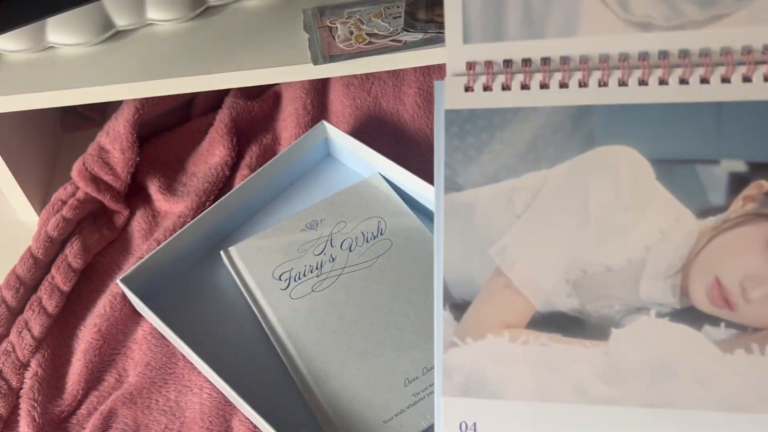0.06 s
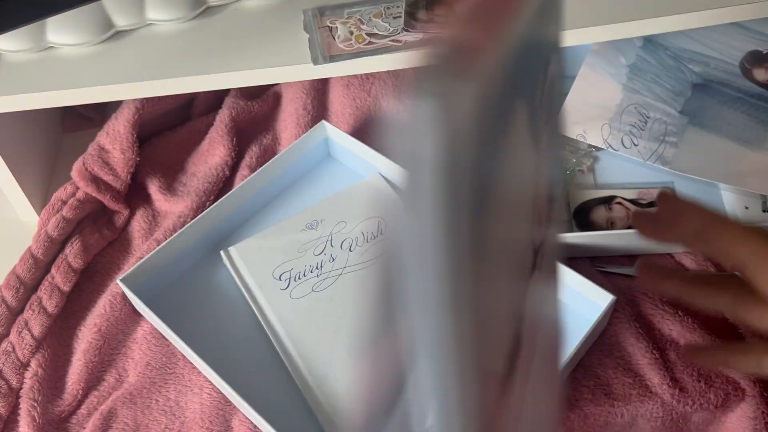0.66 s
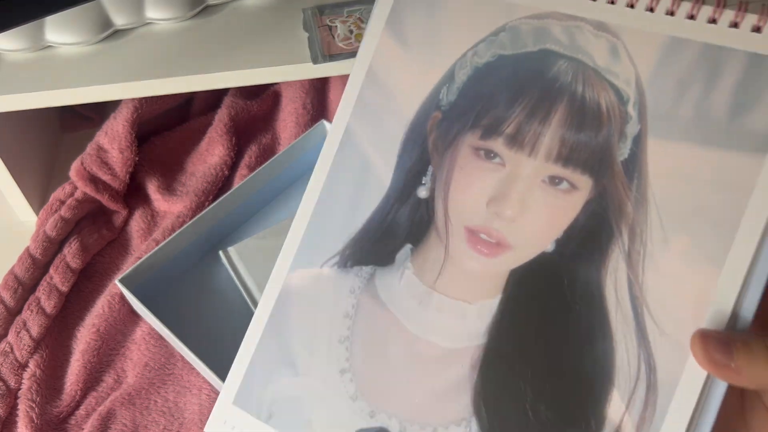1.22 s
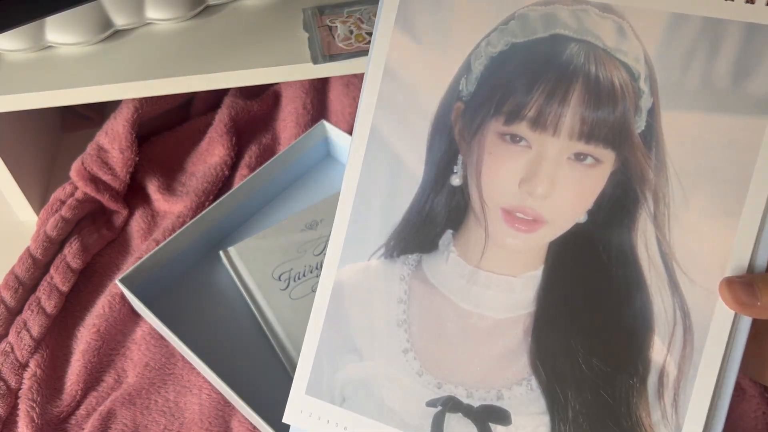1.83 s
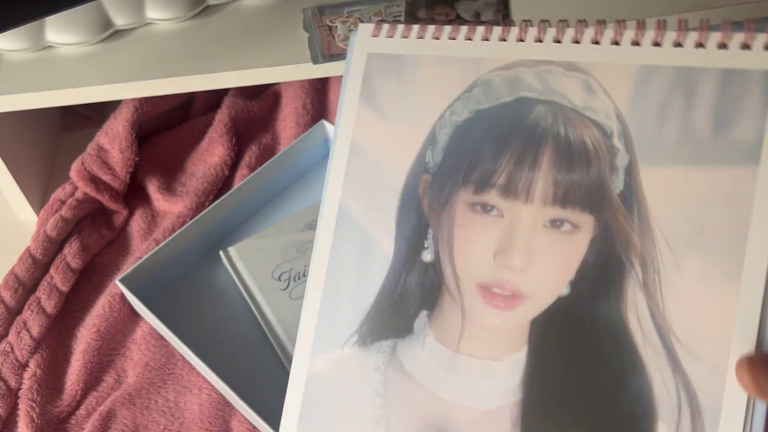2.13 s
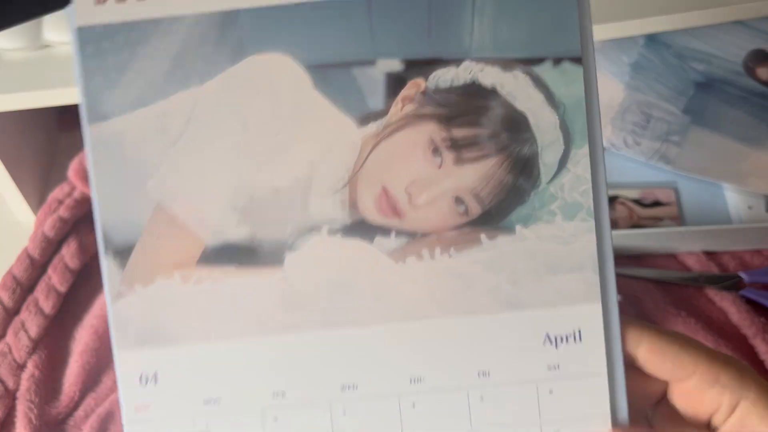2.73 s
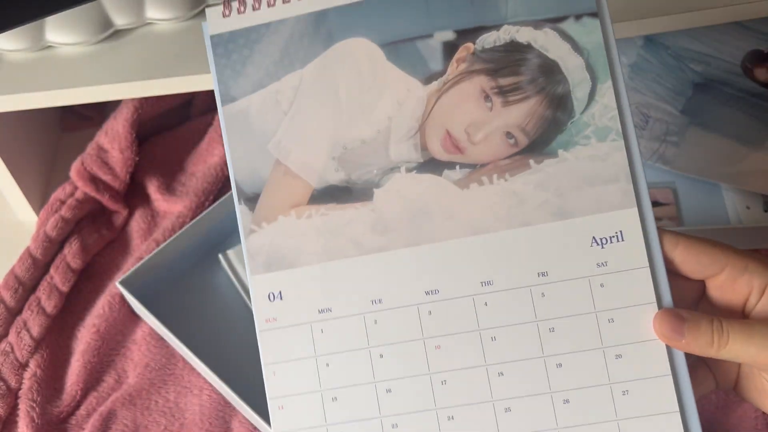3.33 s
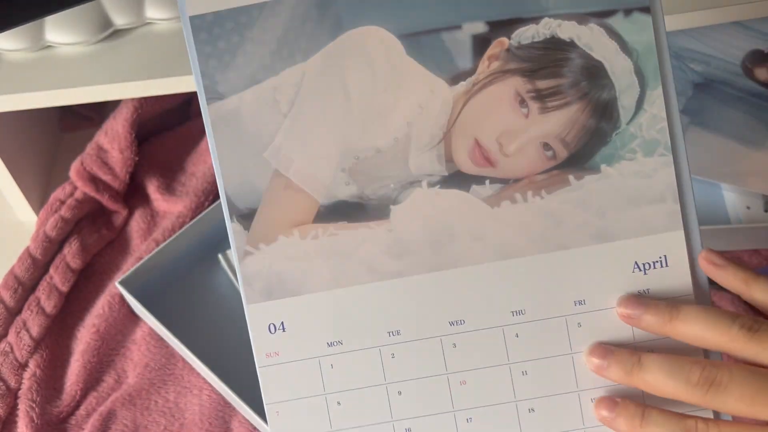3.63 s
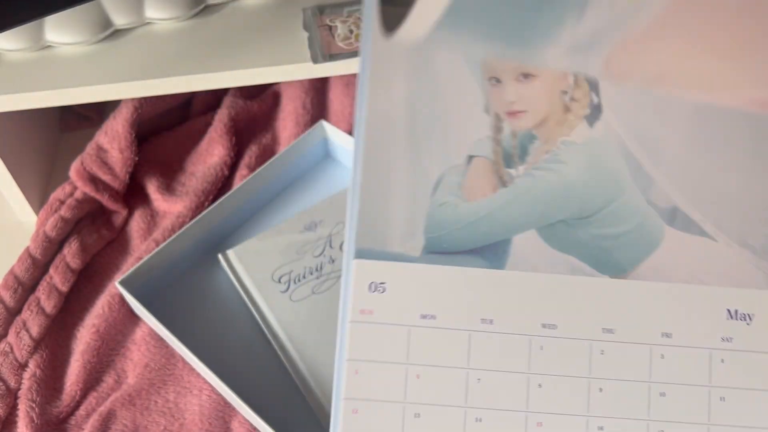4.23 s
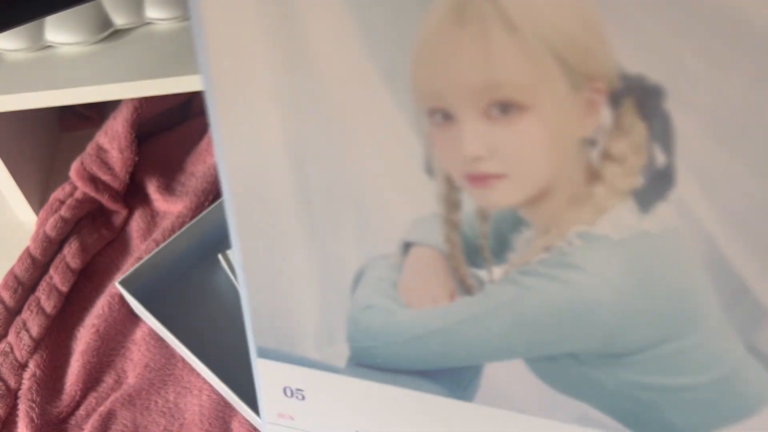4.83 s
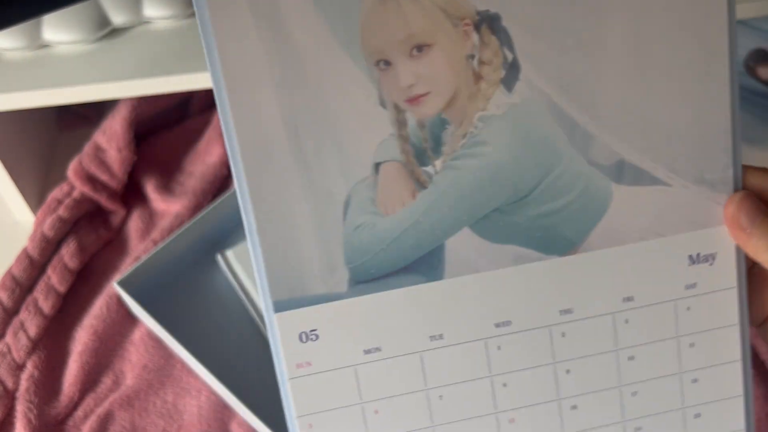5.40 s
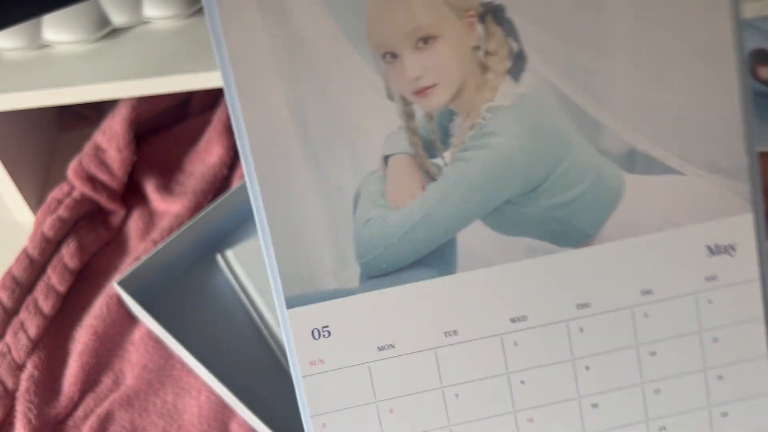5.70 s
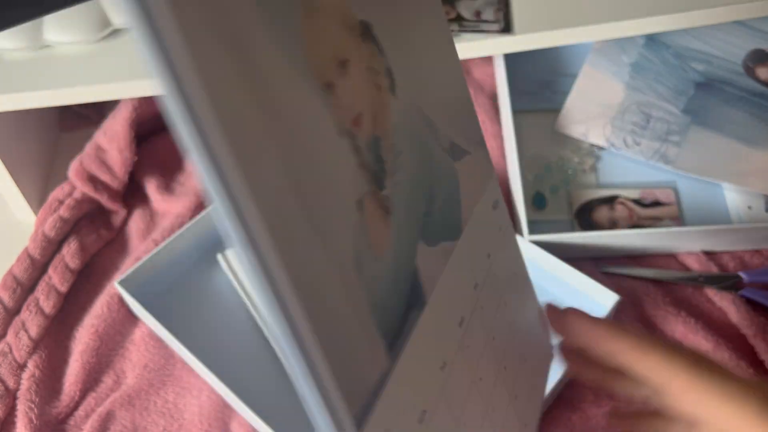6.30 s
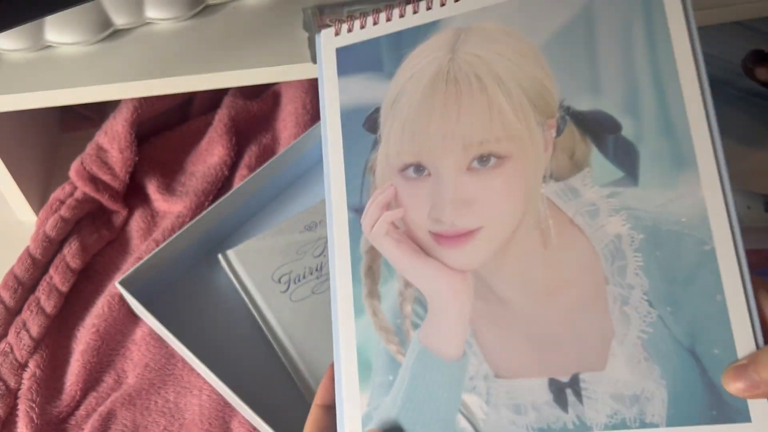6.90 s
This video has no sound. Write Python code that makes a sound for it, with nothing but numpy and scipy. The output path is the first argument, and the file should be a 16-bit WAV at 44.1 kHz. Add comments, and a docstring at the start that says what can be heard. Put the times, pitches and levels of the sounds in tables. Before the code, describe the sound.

A spiral-bound desk calendar is handled close to the microphone in a small, soft room. A stiff page slaps down and the hollow card stand knocks. Faint paper slides follow, then a snap with a soft thump. Past the middle, a page crackles over the wire binding and lands with several sharp flaps. Light taps and small fingertip squeaks finish, over a low, wavering hum.

```python
"""A stiff page slaps down and a hollow card stand knocks: a spiral-bound desk calendar is handled near a phone.
Sheets slide by stick-slip friction, catch on the wire binding and land with a snap; each contact sends
dispersive bending waves through the paper. Fingers pat and rub the gloss, and the hand bumps the stand with low
thumps. Behind it a low hum wavers under a faint drone and hiss, in a small, soft room."""
import sys
import numpy as np
from scipy import signal
from scipy.fft import rfft, irfft
from scipy.io import wavfile
from scipy.ndimage import uniform_filter1d

SR = 44100
rng = np.random.default_rng(int(sys.argv[2]) if len(sys.argv) > 2 else 0)


def dump(signal):
    """Clip the signal to [-1, 1] and save it as 16-bit WAV at the path in sys.argv[1]."""
    limited = np.clip(np.atleast_2d(signal).T, -1, 1)
    pcm = np.round(limited * 32767).astype(np.int16)
    wavfile.write(sys.argv[1], SR, pcm)


N = 306495
TIME = np.arange(N) / SR


# Table levels are relative. A "colour" is the arguments of paper(): level/dB, body/dB, edge/dB, ring f/Hz, ring/dB.
# Sheets landing: t/s, T60/s, colour (five columns), skid level/dB, skid length/s
LANDINGS = [(0.033, 0.038, -21, 10.5, -16, 950, 8, -75, .03),
            (.082, 0.078, -3.5, -2, -10, 1080, 11, -61, .04),
            (0.132, 0.015, -7, -24, -9.5, 5500, -0.5, -75, .02),
            (0.1553, 0.014, -3.5, -2, 1.5, 520, 9, -56, 0.02), (0.205, 0.18, -19, 0, -1, 2400, 2, -70, .03),
            (0.2461, 0.021, -4.5, 15, 1.5, 3300, 3, -53, 0.032),
            (0.774, 0.0087, -20, -4, -1, 5830, 2, -63.5, 0.055),
            (2.3341, 0.026, -2.5, -5.5, -8, 3300, 10, -49, 0.071),
            (2.339, 0.061, -29.5, 7, -14, 690, 24, -74, 0.046),
            (2.73, 0.012, -24, -19, -13.5, 3000, 0.5, -55, 0.08),
            (3.4963, 0.04, -24, 19.5, -29, 1970, 18.5, -67, .025),
            (4.232, 0.05, -13.5, -6, -7.5, 2960, 8, -68, 0.035),
            (4.327, .022, -21, -3, -4, 4800, 5, -72, .03),
            (4.365, 0.039, -11, 20.5, 4, 5200, 5.5, -59, 0.059),
            (4.476, 0.05, -16, 10.5, 8, 3020, 5.5, -52.5, 0.068),
            (4.5448, 0.028, -16.5, 21, -5, 452, 3, -63.5, 0.21),
            (4.6313, 0.034, 4, 5, -3, 2920, 5, -45, 0.045), (4.71, 0.049, 2, 6, -13.5, 780, 3.5, -53, .04),
            (5.379, .01, -33.5, 3, -7, 3050, 9, -76, .02), (5.4104, .025, -20, 8, 2, 4880, 5.5, -49, 0.066),
            (5.642, .027, -32, 22.5, 5, 2290, 7.5, -81.5, 0.35)]

def slaps(skid_swell_s=0.015):
    """Impact, then sliding friction: a sheet lands with a snap and skids on through the same resonances."""
    out = np.zeros((2, N))
    for s, t60, level_db, *timbre, skid_db, skid_s in LANDINGS:
        add(out, *snap(s, t60, [level_db, *timbre]))
        skid_fade_s = max(skid_s - skid_swell_s, .005)
        add(out, *slide(s + skid_swell_s, skid_swell_s, skid_fade_s, [skid_db, *timbre]))
    return out


# The turning page catching on wire loops: t/s, T60/s, level/dB, ring/dB
WIRE_CATCHES = [(3.894, 0.025, -4, -10), (3.919, 0.045, -5, -7), (3.924, 0.019, -2.5, 0),
                (3.959, 0.045, 0.5, 2), (3.9645, 0.089, 0.5, 12.5), (3.975, 0.046, -1.5, 7),
                (3.987, .02, 0, 5), (4.006, 0.015, -2.5, 4), (4.013, 0.0058, -1.5, -4),
                (4.029, 0.026, 0, 3), (4.055, 0.014, -.5, -4), (4.0847, 0.032, 2, -1),
                (4.104, 0.0084, -5, -4.5), (4.11, 0.045, -8.5, 17), (4.13, 0.038, -1.5, 2),
                (4.145, 0.013, -10.5, 12), (4.156, 0.04, -8, 9), (4.17, 0.045, -6, -3),
                (4.1896, 0.026, -3, 3.5)]
# Slackness of that page: t/s, slack (0 taut to 1 limp)
PAGE_SLACK = [(3.89, 0.3), (4.0, 0.49), (4.12, 0.83), (4.19, 0.75)]

def catches(body_db=(-3, 12), edge_db=(-5.5, -17), ring_hz=(600, 500)):
    """Tension sets timbre: ticks on the binding grow fuller, duller and lower. Pairs are (taut, limp)."""
    out = np.zeros((2, N))
    for s, t60, level_db, ring_db in WIRE_CATCHES:
        slack = curve(PAGE_SLACK, s)
        timbre = [taut + slack * (limp - taut) for taut, limp in (body_db, edge_db, ring_hz)]
        add(out, *snap(s, t60, [level_db, *timbre, ring_db]))
    return out


# Paper sliding on paper or wire: peak t/s, swell/s, fade/s, colour (five columns)
SHEET_STROKES = [(.065, 0.077, 0.077, -56.5, 22, 9, 1090, 9),
                 (0.714, 0.061, 0.15, -66.5, -10, -2, 2550, 5.5),
                 (0.971, .14, 0.14, -71.5, 17, 15, 3940, 8), (1.05, 0.03, 0.033, -70.5, 10, 9.5, 3990, 15),
                 (1.245, 0.053, .06, -78, 16, 3, 3920, 14.5),
                 (1.898, 0.028, 0.027, -74.5, 7, 16.5, 4700, 18), (2.24, 0.1, 0.087, -65, 13, 3.5, 2420, 6),
                 (2.868, 0.056, 0.14, -73.5, 15, 17.5, 3200, 5.5),
                 (3.011, .034, 0.15, -65.5, -7, -3, 3250, 3.5),
                 (3.17, 0.05, 0.034, -80.5, 10, 15, 4300, 13),
                 (3.897, 0.052, .055, -50.5, -18, 14.5, 4230, 9),
                 (3.977, 0.094, 0.081, -34, 3, -4.5, 560, 10), (4.115, .06, 0.13, -42, 8, -4, 500, -2),
                 (4.35, 0.08, 0.12, -59, 17, 0.5, 4730, 5), (4.638, .022, 0.016, -38.5, 13, 2, 2860, 0),
                 (4.685, 0.041, 0.085, -42.5, 7, -5, 760, 7.5),
                 (4.88, 0.022, 0.037, -71, 29, 14, 3570, 8.5),
                 (5.105, .012, 0.051, -64.5, -3, 5.5, 3200, -1),
                 (5.496, 0.034, .024, -59.5, -3, 8.5, 3230, 2.5),
                 (6.272, 0.034, 0.062, -62, -5, -7, 3780, 0)]

def strokes():
    """Friction noise: sheets slide over each other and along the wire."""
    out = np.zeros((2, N))
    for peak, swell, fade, *colour in SHEET_STROKES:
        add(out, *slide(peak, swell, fade, colour))
    return out


def snap(s, t60, colour, rough_db=3, crack=.8, lead=80, size=4096):
    """Impulsive excitation: a brush, one crack and exponentially damped flutter. Gives (start, sound)."""
    t = (np.arange(size) - lead) / SR
    approach_db = np.interp(t, [t[0], 0], [-34, -12])
    envelope_db = np.where(t < 0, approach_db, -60 * t / max(t60, .004))
    flutter = rng.standard_normal((2, size)) * gain_of(envelope_db + rough_db * wander(1008, size))
    burst = flutter / np.linalg.norm(flutter, axis=1, keepdims=True)
    burst[:, lead + 16] += crack
    return s + t[0], paper(whitened(spread(burst)), *colour)


def slide(peak, swell, fade, colour, clump_db=2, size=16384):
    """Friction noise follows contact pressure, which swells and fades in clumps. Gives (start, sound)."""
    t = np.arange(size) / SR
    end = swell + fade
    pressure_db = np.interp(t, [0, swell, end], [-10, 6, -14]) + clump_db * wander(199.4, size)
    contact = np.interp(t, [0, swell / 3, end, end + .012], [0, 1, 1, 0])
    return peak - swell, paper(friction(size) * gain_of(pressure_db) * contact, *colour)


def friction(size, grains_per_s=2200, grain_db=4.0, hiss_gain=0.59):
    """Stick-slip motion: tiny random slips over a smooth hiss."""
    strengths = gain_of(grain_db * np.minimum(rng.exponential(1, size), 3))
    slips = rng.random(size) < grains_per_s / SR
    grains = unit_rms(strengths * slips * rng.choice([-1, 1], (2, size)))
    hiss = hiss_gain * rng.standard_normal((2, size))
    return unit_rms(shifting_contact(spread(grains + hiss)))


def shifting_contact(x, depth_db=3.5, bins=5, frames=9):
    """Spectral modulation: as a sheet bends its contact moves, so patches of spectrum flare and fade."""
    spectra = signal.stft(x, nperseg=256)[2]
    patches = uniform_filter1d(rng.standard_normal(spectra.shape[1:]), bins, axis=0)
    patches = unit_rms(uniform_filter1d(patches, frames, axis=1))
    return signal.istft(spectra * gain_of(depth_db * patches), nperseg=256)[1][:, :x.shape[1]]


# Broad spectrum of the sheets: f/Hz, level/dB
PAPER_SPECTRUM = [(40, -54), (80, -16.5), (150, -5), (300, -2), (500, -1.5), (1500, 1), (4000, -1),
                  (9000, -9.5), (16000, -9.5)]
# Resonances of a sheet: f/Hz, bandwidth/Hz, level/dB
SHEET_MODES = [(606, 135.6, 0), (926, 100, -3), (1580, 600, -2.5), (2310, 54, 2.5), (2870, 130, -3),
               (3540, 90, 2), (4300, 440, -1.5)]

def paper(drive, level_db, body_db, edge_db, ring_hz, ring_db, delay_at_1khz_s=0.001199, size=2048):
    """Thin-plate response: slack gives body, a sharp edge brightness, the bend one broad resonance."""
    signed_hz = np.fft.fftfreq(size, 1 / SR)
    hz = np.abs(signed_hz) + 1
    db = level_db + spectrum_at(PAPER_SPECTRUM, hz)
    db += body_db / (1 + (hz / 700) ** 2)
    db += edge_db / (1 + (5500 / hz) ** 4)
    db += ring_db * np.exp(-(2 * np.log2(hz / ring_hz)) ** 2)
    db += sum(peak / (1 + (2 * (hz - f) / width) ** 2) for f, width, peak in SHEET_MODES)
    minimum_phase = np.exp(np.conj(signal.hilbert(db * np.log(10) / 20)))
    # bending waves are slower at low frequency, so every click sweeps down
    dispersion = np.exp(-4j * np.pi * delay_at_1khz_s * np.sign(signed_hz) * np.sqrt(1000 * hz))
    response = faded(np.fft.ifft(minimum_phase * dispersion).real)
    return signal.fftconvolve(drive, response[None], axes=1)


# Blows on the stand: t/s, level/dB
STAND_BLOWS = [(0.078, -27), (0.0807, -28.5), (.087, -22.5), (0.0928, -32.5), (0.101, -45)]
# Modes of the stand: f/Hz, level/dB, T60/s
STAND_MODES = [(125, -12, .1), (250, -13, .06), (345, -8, .06), (425, -7, .05), (695, -9, .04),
               (795, -2, .045), (1098, -1, .048), (1225, -3, .045), (1356, -5, .04), (1525, -4, .033),
               (2045, -18, .03)]

def knocks(gain_db=0.5, attack_s=0.00045, size=8192):
    """Modal ringing: the hollow card stand rattles on the pages, and flexing detunes each blow a little."""
    out, t = np.zeros((2, N)), np.arange(size) / SR
    for s, level_db in STAND_BLOWS:
        flex = rng.uniform(.965, 1.035, len(STAND_MODES))
        ring = sum(gain_of(db - 60 * t / t60) * np.sin(2 * np.pi * (hz * detune * t + rng.random()))
                   for (hz, db, t60), detune in zip(STAND_MODES, flex))
        add(out, s, gain_of(level_db + gain_db) * ring * (1 - np.exp(-t / attack_s)))
    return out


# Low thumps of the hand bumping the stand: t/s, level/dB, f/Hz, T60/s
STAND_BUMPS = [(.248, -46, 150.5, 0.13), (2.335, -36, 203, 0.051), (2.387, -38, 181, 0.037),
               (4.088, -36, 194, 0.066), (4.109, -38.5, 168, 0.04), (4.119, -33.5, 168, 0.14),
               (4.369, -47, 249, 0.071)]

def thumps(overtone_ratio=1.7, overtone_db=-5, attack_s=0.00117, size=8192):
    """Damped oscillation: each bump gives a brief low thump in two inharmonic modes."""
    out, t = np.zeros((2, N)), np.arange(size) / SR
    for s, level_db, hz, t60 in STAND_BUMPS:
        phase = 2 * np.pi * hz * t
        flap = np.sin(phase) + gain_of(overtone_db) * np.sin(overtone_ratio * phase)
        add(out, s, flap * gain_of(level_db - 60 * t / t60) * (1 - np.exp(-t / attack_s)))
    return out


# A fingertip on gloss: peak t/s, swell/s, fade/s, level/dB, peak fundamental f/Hz,
# pitch sag at both ends (0 to 1), scuff level/dB, scuff edge/dB
FINGER_DRAGS = [(.414, 0.015, 0.036, -60.5, 1897, 0.3, -58, 3),
                (2.793, 0.025, 0.019, -56.5, 956, 0.32, -50.5, -10),
                (5.159, 0.014, 0.059, -64.5, 2570, 0.03, -62, -4.5),
                (5.916, 0.025, 0.011, -61, 2530, 0.25, -61.5, -4.5),
                (6.415, .035, 0.027, -59.5, 710, 0.47, -59, 0),
                (6.617, 0.043, 0.057, -49.5, 730, 0.39, -51.5, 2)]
SCUFF_LINGER_S, SCUFF_BODY_DB, SCUFF_RING_HZ, SCUFF_RING_DB = 0.033, 5.5, 1750, 5.5

def drags(harmonics_db=(0, -1, -8, -16, -13)):
    """Friction-induced vibration: a fingertip squeaks, its pitch following its speed, over a dry scuff."""
    out = np.zeros((2, N))
    for s, swell, fade, level_db, hz, sag, scuff_db, edge_db in FINGER_DRAGS:
        t = np.arange(-swell, fade, 1 / SR)
        speed = np.cos(np.pi / 2 * t / np.where(t < 0, swell, fade))
        pitch = hz * (1 - sag * (1 - speed))
        chatter = rng.standard_normal(len(t))
        squeak = sum(gain_of(db) * unit_rms(resonate(chatter, k * pitch, 4.5 * np.sqrt(k * hz)))
                     for k, db in enumerate(harmonics_db, 1))
        squeak = signal.lfilter(*signal.butter(1, 3000, fs=SR), squeak)  # soft skin dulls the top
        add(out, s - swell, unit_rms(squeak) * gain_of(level_db) * speed ** 2)
        scuff_colour = [scuff_db, SCUFF_BODY_DB, edge_db, SCUFF_RING_HZ, SCUFF_RING_DB]
        add(out, *slide(s, swell, fade + SCUFF_LINGER_S, scuff_colour))
    return out


# Finger pads landing on the card: peak t/s, level/dB
FINGER_PATS = [(.272, -58), (0.803, -65.5), (2.385, -66), (3.104, -67.5), (4.795, -71.5), (5.336, -68.5),
               (6.154, -70.5)]
# Timbre of a pat: body/dB, edge/dB, ring f/Hz, ring/dB
PAT_TIMBRE = (26, -8.5, 502, 6.5)

def pats(swell_s=.012, fade_s=0.029):
    """Soft contact excites mostly low frequencies: a finger pad gives a dull brush without a click."""
    out = np.zeros((2, N))
    for s, level_db in FINGER_PATS:
        add(out, *slide(s, swell_s, fade_s, [level_db, *PAT_TIMBRE]))
    return out


# Changes of grip: start t/s, end t/s
GRIP_SHIFTS = [(3.05, 3.64), (5.049, 5.74), (5.599, 6.25)]
# Colour of their rustle: level/dB, body/dB, edge/dB, ring f/Hz, ring/dB
RUSTLE_COLOUR = (-73.5, 10, 3.5, 3200, 8.5)

def grips(uneven_db=4, touches_hz=22):
    """Friction under uneven pressure: the sheets rustle faintly while the fingers shift."""
    contact = sum(np.sqrt(np.interp(TIME, [start, (start + end) / 2, end], [0, 1, 0]))
                  for start, end in GRIP_SHIFTS)
    rustle = friction(N) * contact * gain_of(uneven_db * wander(touches_hz, N))
    return paper(rustle, *RUSTLE_COLOUR)[:, :N]


# Left microphone port relative to the right: f/Hz, level/dB
LEFT_RESPONSE = [(80, -1), (300, -9.5), (700, -2.5), (2000, -7), (4400, -5.5), (9000, -11), (15000, -13)]
# The calendar swinging toward the middle and back: t/s, extra level on the left/dB
LEFT_SWING = [(.1, -2), (.3, -1.5), (.8, 1.5), (2.35, 1), (3.5, 1.5), (4, -2.5), (4.65, -1), (5.4, 0.5),
              (6.6, 0.5)]

def direct_path(calendar, lag_samples=7):
    """Path difference: the calendar is nearer the right port, so the left hears it later and softer."""
    left = np.roll(filtered(calendar[0], LEFT_RESPONSE), lag_samples)
    return np.array([left * gain_of(curve(LEFT_SWING)), calendar[1]])


# Reverberation time of the room: f/Hz, T60/s
ROOM_DECAY = [(150, 0.48), (600, 0.129), (3000, 0.17), (8000, 0.13), (16000, 0.24)]

def room(x, gap_s=.004, density=.1, size=16384):
    """Reverberation: dense reflections from nearby furniture, each band decaying at its own rate."""
    reflections = rng.standard_normal((2, size)) * (rng.random((2, size)) < density)
    reflections *= np.arange(size) > gap_s * SR
    hz, t, spectra = signal.stft(spread(reflections, split_hz=520), SR, nperseg=256)
    decay = gain_of(-60 * t / spectrum_at(ROOM_DECAY, hz)[:, None])
    tail = signal.istft(spectra * decay, SR, nperseg=256)[1]
    return signal.fftconvolve(x, tail / np.linalg.norm(tail[0]), axes=1)[:, :N]


# Level of the hum: t/s, level/dB
HUM_LEVEL = [(0.0, -46), (0.08, -43), (0.31, -43.5), (0.48, -60), (1.45, -57), (1.62, -81), (1.92, -66.5),
             (2.03, -48.5), (2.15, -59.5), (2.61, -50), (2.75, -59.5), (3.06, -52.5), (3.83, -64.5),
             (3.93, -54), (4.2, -60), (6.02, -58.5), (6.06, -64), (6.95, -57)]
# Drift of its pitch: t/s, f/Hz
HUM_DRIFT = [(.05, 83.84), (.55, 100), (1.0, 88.12), (2.6, 84.94), (3.9, 85.44), (4.6, 89.6), (6.25, 92.5),
             (6.5, 77.1), (6.95, 88)]

def hum(gain_db=-0.08, noise_gain=0.64, waver_db=2.5, waver_hz=14):
    """Random amplitude modulation: a low, drifting tone wavers and beats with narrow-band noise."""
    pitch = curve(HUM_DRIFT)
    noise = unit_rms(resonate(rng.standard_normal(N), pitch, 22))
    level_db = gain_db + curve(HUM_LEVEL) + waver_db * wander(waver_hz, N)
    return unit_rms(tone(pitch) + noise_gain * noise) * gain_of(level_db)


# Resonances above the hum: f/Hz, half-bandwidth of each filter stage/Hz, level/dB
DRONE_BANDS = [(120.2, 16, -1), (145.7, 20, -1.5), (178.3, 20, -4), (225.9, 12, -1.5)]
# Level of the drone: t/s, level/dB
DRONE_LEVEL = [(.2, -59), (.9, -63.5), (1.65, -68), (2.2, -65), (3.8, -63.5), (4.8, -64.5), (5.8, -59),
               (6.1, -62.5), (6.9, -60)]

def drone(swell_s=6.645, swell_hz=226, swell_db=-49, rise_s=0.035, fall_s=0.078):
    """Noise-driven resonance: four low bands drone, and a tone swells once at the highest."""
    bands = sum(gain_of(db) * unit_rms(resonate(rng.standard_normal(N), hz, 2 * half_width))
                for hz, half_width, db in DRONE_BANDS)
    swell = gain_of(swell_db) * tone(swell_hz + 4 * wander(27, N))
    swell *= np.exp(-abs(TIME - swell_s) / np.where(TIME < swell_s, rise_s, fall_s))
    return unit_rms(bands) * gain_of(curve(DRONE_LEVEL)) + swell


# Spectral density of the room's hiss: f/Hz, level/dB
AIR_SPECTRUM = [(160, -19), (280, -0.5), (315, -6.5), (393, -6), (498, -10.5), (570, -11.5), (1070, -17),
                (1310, -19.5), (1500, -21.5), (1770, -23), (2320, -21.5), (3730, -11), (5060, -30),
                (12200, -33.5), (16000, -40.5)]

def air(level_db=-74.5, shared_gain=0.56):
    """Partly coherent noise: a faint steady hiss, some of it common to both ports."""
    noise = rng.standard_normal((2, N)) + shared_gain * rng.standard_normal(N)
    hiss = filtered(noise, AIR_SPECTRUM)
    return gain_of(level_db) * hiss / np.std(hiss.mean(0))


def spread(pair, split_hz=2200):
    """Coherence of a wide source: both ports share its lows, but each gets its own highs."""
    lows = signal.lfilter(*signal.butter(2, split_hz, fs=SR), pair[1])
    highs = signal.lfilter(*signal.butter(2, split_hz, "high", fs=SR), pair, axis=1)
    return lows - highs


def resonate(x, hz, stage_width_hz):
    """Two cascaded resonators of unit gain, whose centre can follow a curve."""
    carrier = np.exp(2j * np.pi * np.cumsum(hz * np.ones(len(x))) / SR)
    r = np.exp(-np.pi * stage_width_hz / SR)
    baseband = signal.lfilter([(1 - r) ** 2], [1, -2 * r, r * r], x / carrier + 1e-18)
    return 2 * (carrier * baseband).real


def whitened(x, bins=128):
    """Spectral whitening: a burst loses its broad colour and keeps its fine ripple."""
    spectrum = rfft(x, axis=1)
    power = uniform_filter1d(abs(spectrum) ** 2, bins, axis=1)
    return faded(irfft(spectrum / np.sqrt(power + 1e-12), axis=1))


def filtered(x, table):
    """Linear filtering by a table of f/Hz, level/dB."""
    return irfft(rfft(x) * gain_of(spectrum_at(table, np.fft.rfftfreq(N, 1 / SR))), N)


def spectrum_at(table, hz):
    """Interpolation on a log-frequency axis."""
    f, value = np.transpose(table)
    return np.interp(np.log(hz + 1), np.log(f + 1), value)


def curve(table, t=TIME):
    """Linear interpolation in time."""
    return np.interp(t, *np.transpose(table))


def tone(hz):
    """A sine of unit rms whose phase is the integral of its frequency."""
    return np.sqrt(2) * np.sin(2 * np.pi * np.cumsum(hz) / SR)


def wander(rate_hz, size):
    """A smooth random signal of about unit spread."""
    knots = rng.standard_normal(size)
    return np.interp(np.arange(size) * rate_hz / SR, np.arange(size), knots)


def faded(x):
    """Tapers the second half of a sound to silence."""
    return x * np.clip(np.linspace(2, 0, x.shape[-1]), 0, 1) ** 2


def unit_rms(x):
    return x / np.sqrt(np.mean(x ** 2) + 1e-20)


def gain_of(db):
    return 10 ** (np.asarray(db) / 20)


def add(mix, s, sound):
    """Superposes a mono or stereo sound on both channels at time s."""
    part = mix[:, max(0, round(s * SR)):][:, :sound.shape[-1]]
    part += sound[..., :part.shape[1]]


def scene(room_db=(-16, -12), hum_and_drone_db=(-2.4, 1)):
    """Superposition of direct sound, reverberation and background. Pairs are (left, right)."""
    calendar = slaps() + catches() + strokes() + grips() + pats() + knocks() + drags() + thumps()
    reverberation = gain_of(room_db)[:, None] * room(calendar)
    background = gain_of(hum_and_drone_db)[:, None] * (hum() + drone()) + air()
    return direct_path(calendar) + reverberation + background


def record(dry, low_cut_hz=58, high_cut_hz=15950):
    """Band limiting: the phone cuts the deep bass and the highest treble."""
    thinned = signal.sosfilt(signal.butter(4, low_cut_hz, "high", fs=SR, output="sos"), dry)
    low_pass = signal.firwin(511, high_cut_hz, window=("kaiser", 9), fs=SR)
    return signal.oaconvolve(thinned, low_pass[None], "same")


dry = scene()
out = record(dry)
dump(out)
```